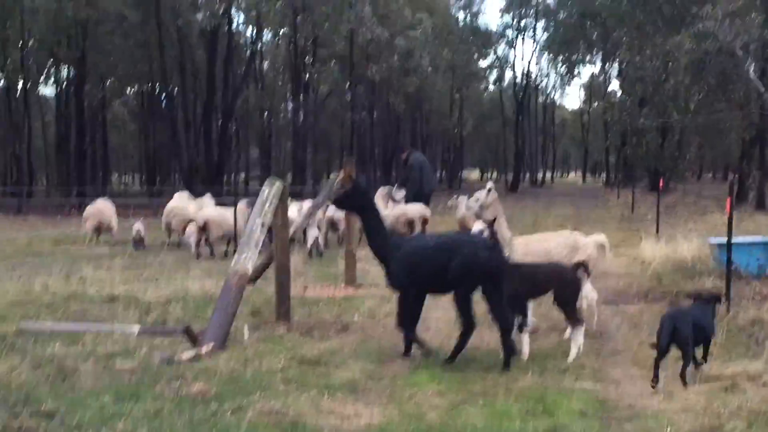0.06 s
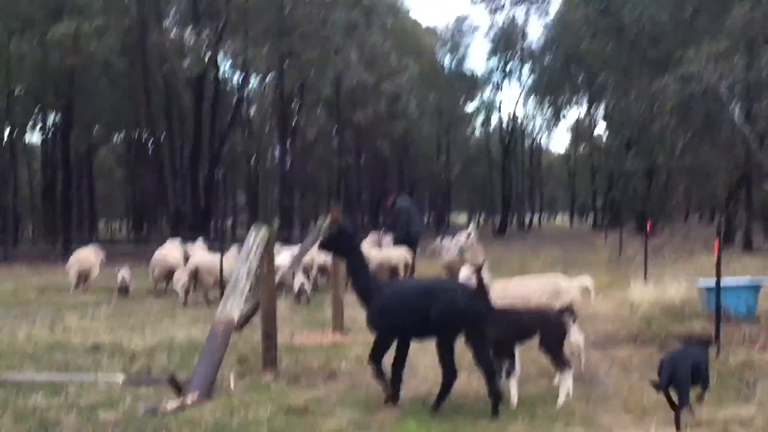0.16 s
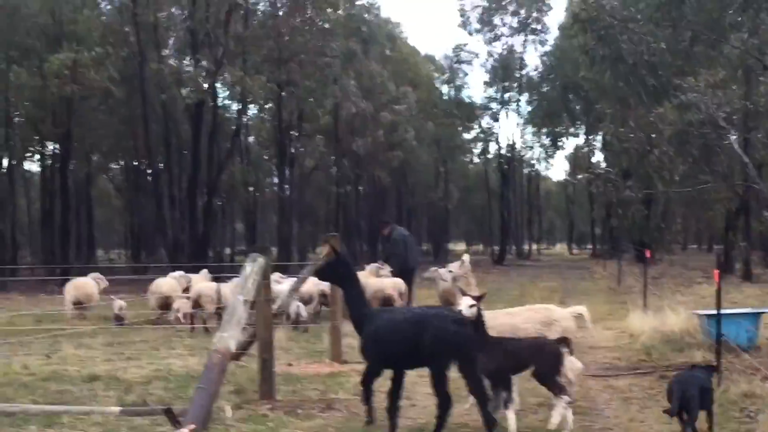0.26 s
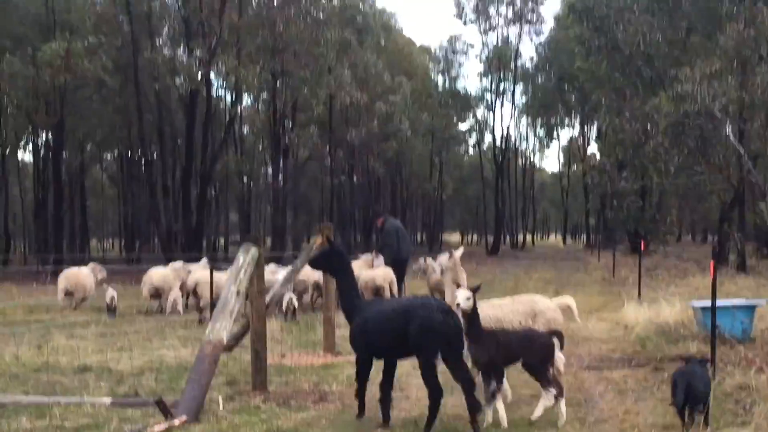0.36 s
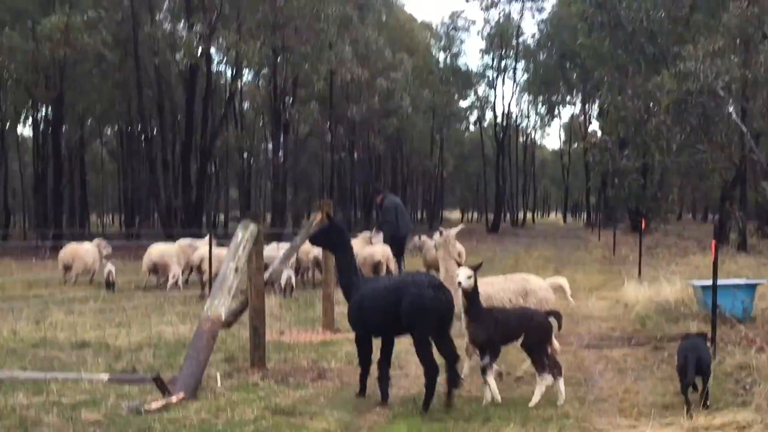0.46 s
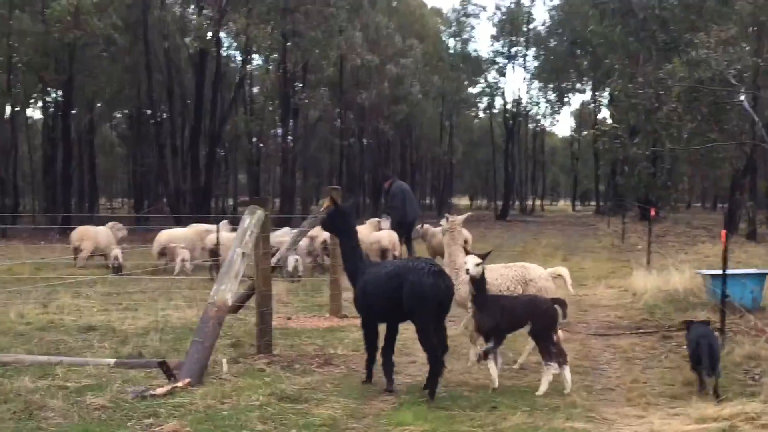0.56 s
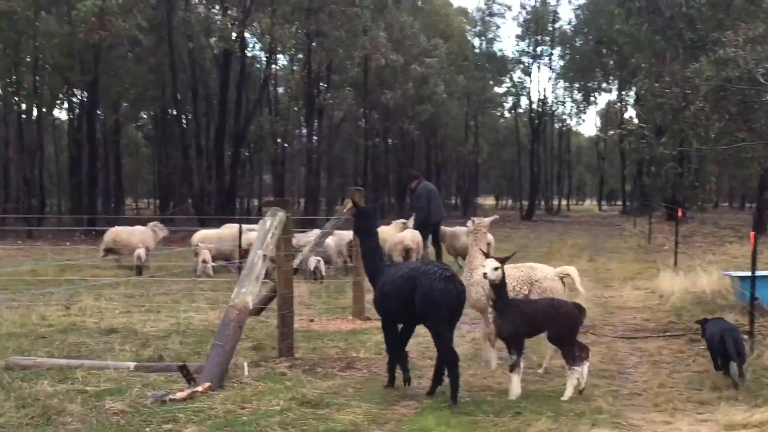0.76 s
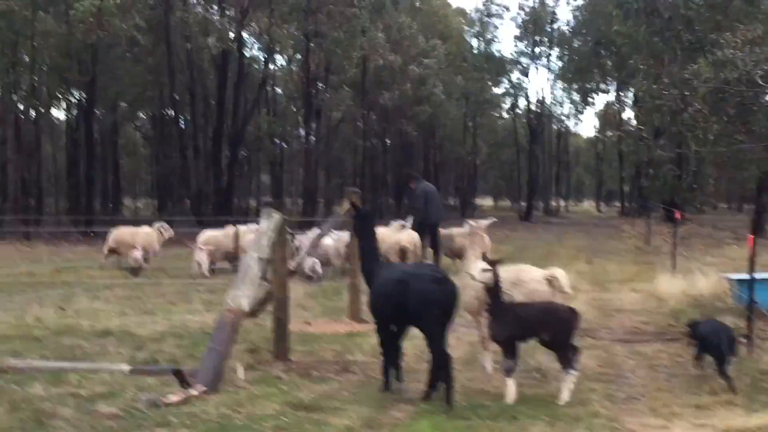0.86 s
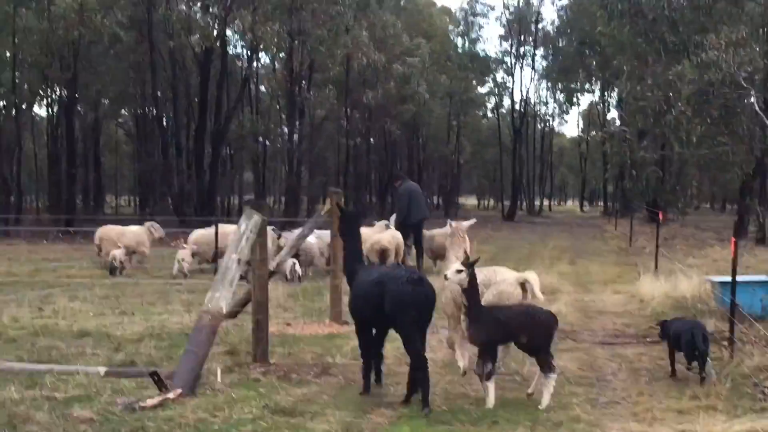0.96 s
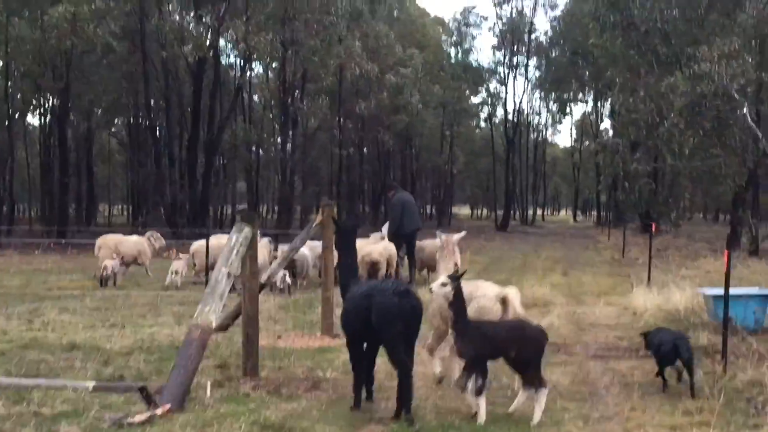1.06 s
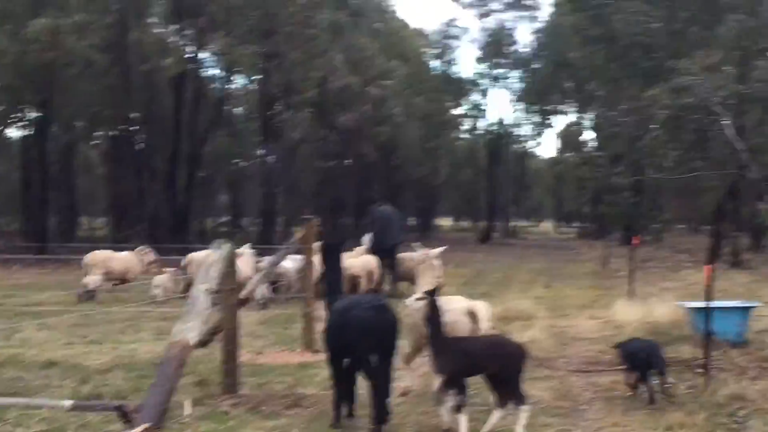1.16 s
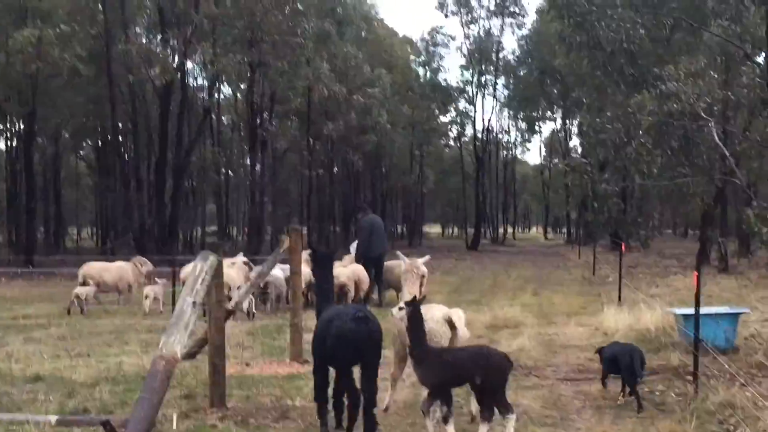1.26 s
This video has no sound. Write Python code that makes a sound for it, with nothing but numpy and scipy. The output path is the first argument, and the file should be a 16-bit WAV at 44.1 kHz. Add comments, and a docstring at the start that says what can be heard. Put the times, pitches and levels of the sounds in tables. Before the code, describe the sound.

A sheep gives one low, harsh bleat in a paddock, just after a faint grunt. It starts round, turns rasping and ends in a thin creak. Light wind and soft bumps touch the microphone throughout.

```python
"""First come light wind, a few soft bumps and a faint grunt; then a sheep in a paddock bleats once.
The bleat is low and harsh: sharp pulses from the throat make the resonances of the mouth ring.
It starts round, turns bright and rasping as the mouth opens, and ends in a thin creak.
Trees echo faintly, the grass rustles, and a faint wavering tone follows the bleat."""
import sys
import numpy as np
from scipy import signal
from scipy.fft import rfft, irfft, next_fast_len
from scipy.io import wavfile
from scipy.ndimage import uniform_filter1d, map_coordinates

SR = 44100
rng = np.random.default_rng(int(sys.argv[2]) if len(sys.argv) > 2 else 0)


def dump_mix(stems):
    """Bounce the given channels to the path in sys.argv[1] as a 16-bit WAV at rate SR."""
    frames = np.atleast_2d(stems).T  # one column per channel
    limited = np.clip(frames, -1, 1)  # hard clip at full scale
    pcm = np.round(limited * 32767).astype(np.int16)
    wavfile.write(sys.argv[1], SR, pcm)


N = 57330
TIME = np.arange(N) / SR


def amp(db):
    """Turn decibels into a number to multiply by."""
    return 10 ** (np.asarray(db) / 20)


def unit(x):
    """Scale a sound so that its average strength (rms) is 1."""
    return x / np.sqrt(np.mean(x ** 2) + 1e-20)


def along(points, hz):
    """Read between (f/Hz, value) points, spacing the frequencies by octaves."""
    freqs, values = np.transpose(points)
    return np.interp(np.log(hz + 1), np.log(freqs + 1), values)


def curve(rows):
    """Join (t/s, value) points with straight lines, one value per sample."""
    return np.interp(TIME, *np.transpose(rows))


def wobble(per_s):
    """A smooth curve through per_s random values each second."""
    return map_coordinates(rng.standard_normal(int(N * per_s / SR) + 4), [TIME * per_s])


def colour(x, points):
    """Filter a sound to a (f/Hz, level/dB) shape."""
    size = 2 * next_fast_len(N)
    cepstrum = irfft(np.log(amp(along(points, np.fft.rfftfreq(size, 1 / SR)))), size)
    # this fold makes the filter ring after each pulse, never before it
    cepstrum[1:size // 2] *= 2
    cepstrum[size // 2 + 1:] = 0
    return irfft(rfft(x, size) * np.exp(rfft(cepstrum)), size)[:N]


def noise(points):
    """Noise of strength 1 with a (f/Hz, level/dB) shape."""
    return unit(colour(rng.standard_normal(N), points))


# tone colour of the outdoor air and of the wind (f/Hz, relative level/dB)
AIR_SHAPE = [(20, -53.5), (45, -24), (80, 3), (160, -20), (250, -21), (400, -21), (550, -21.5),
             (1050, -17.5), (1700, -23), (2500, -25), (4000, -26.5), (6000, -30.5), (9000, -33),
             (10300, -36), (11500, -35.5), (17000, -37)]
WIND_SHAPE = [(20, -46), (40, -2.5), (70, -1.5), (110, -9), (200, -7), (330, -18), (700, -34), (2500, -81)]
# how the wind rises and falls (t/s, level change/dB)
WIND_SWELL = [(0, -9), (.13, 2), (.19, -11), (.26, 3), (.5, -0.5), (.9, 1.5), (1.1, -0.5), (1.3, -5)]
AIR_DB, WIND_DB, BUFFET_DB = -65, -65, 2.5


def breeze():
    """Steady outdoor air and a light flutter of wind on the microphone."""
    air = amp(AIR_DB) * noise(AIR_SHAPE)
    wind_db = WIND_DB + curve(WIND_SWELL) + BUFFET_DB * wobble(per_s=18)
    return air + amp(wind_db) * noise(WIND_SHAPE)


# short rustles in the grass (t/s, level/dB, width/s, centre f/Hz)
RUSTLES = [(.228, -62, 0.014, 2220), (0.278, -60, 0.014, 2400), (0.997, -62.5, 0.0052, 2450),
           (1.017, -66, 0.012, 2740), (1.109, -67, 0.016, 1744), (1.163, -76, 0.0017, 1303),
           (1.285, -60, 0.0021, 1520)]
# tone colour of dry grass (multiple of the centre frequency, relative level/dB)
GRASS_SHAPE = [(.15, -8.5), (.5, -11.5), (.75, -6.5), (1, -0.5), (1.2, -13), (2, -22.5), (3.7, -35),
               (6.5, -87)]


def rustles():
    """Dry grass makes brief, faint swells and ticks of noise."""
    out = np.zeros(N)
    for when, db, width, hz in RUSTLES:
        swell = np.exp(-.5 * ((TIME - when) / width) ** 2)
        out += amp(db) * swell * noise([(k * hz, level) for k, level in GRASS_SHAPE])
    return out


# soft thuds of steps and handling (t/s, level/dB, f/Hz, fade time/s)
BUMPS = [(.13, -50, 186, 0.0074), (0.228, -42, 125, 0.009), (0.339, -37, 190, 0.006),
         (.428, -46, 100, .008), (.49, -46, 100, .01), (.572, -51, 120, .025), (0.68, -46, 100, 0.018),
         (.814, -34, 110, 0.008), (0.851, -35, 120, 0.008), (.942, -40.5, 105, 0.009),
         (0.987, -48, 90, 0.01), (1.013, -41, 260, 0.007), (1.042, -48, 150, .007), (1.123, -51, 110, .007),
         (1.186, -56, 215, 0.014), (1.242, -41, 125, 0.009)]
BUMP_SAG, BUMP_SAG_S = .33, .014  # share of its pitch that a thud loses, and how fast
BUMP_ATTACK_S, BUMP_NOISE = .0037, .3


def bumps():
    """Each thud is a low, sinking tone plus dull noise, and dies away at once."""
    out = np.zeros(N)
    for start, db, hz, fade in BUMPS:
        age = np.maximum(TIME - start, 0)
        cycles = hz * ((1 - BUMP_SAG) * age + BUMP_SAG * BUMP_SAG_S * (1 - np.exp(-age / BUMP_SAG_S)))
        dull_noise = noise([(hz / 3, -25), (hz, 0), (2 * hz, -6), (8 * hz, -30), (40 * hz, -70)])
        body = np.sin(2 * np.pi * cycles) + BUMP_NOISE * dull_noise
        out += amp(db) * body * (1 - np.exp(-age / BUMP_ATTACK_S)) * np.exp(-age / fade)
    return out


# how long the trees echo (f/Hz, time to fade by 60 dB/s)
ECHO_TIMES = [(150, 0.65), (500, 0.5), (2300, 0.9), (8000, 0.55)]
ECHO_DB = -13.5


def tree_echo(sound):
    """Trees scatter a sound into a faint, blurred echo."""
    hz, t, spectrum = signal.stft(rng.standard_normal(SR), SR, nperseg=256)
    fade = amp(-60 * t / along(ECHO_TIMES, hz)[:, None])
    tail = signal.istft(spectrum * fade, SR, nperseg=256)[1]
    return amp(ECHO_DB) * signal.fftconvolve(sound, tail / np.linalg.norm(tail))[:N]


def soft_call(rows, overtones, waver):
    """A dull tone with weak overtones; waver sets how unsteady its pitch is."""
    times, hz, db = np.transpose(rows)
    pitch = np.interp(TIME, times, hz) * (1 + waver * wobble(per_s=120))
    phase = 2 * np.pi * np.cumsum(pitch) / SR
    tone = unit(sum(amp(level) * np.sin(round(k) * phase) for k, level in overtones))
    sounding = (TIME > times[0]) & (TIME < times[-1])
    return amp(np.interp(TIME, times, db)) * sounding * tone


# a faint tone after the bleat, and a brief note above it (t/s, f/Hz, level/dB)
FAR_TONE = [(.95, 445.4, -76), (1.016, 448.4, -67), (1.06, 403.7, -73.5), (1.104, 448.7, -67),
            (1.14, 392, -80), (1.19, 392.6, -65), (1.23, 380, -80)]
FAR_PIP = [(1.09, 647.4, -104), (1.112, 622, -61), (1.14, 599, -81)]
# tone colour of both (multiple of the pitch, relative level/dB)
FAR_OVERTONES = [(1, -5), (2, -13.5), (3, -37), (4, -42)]


def far_call():
    """Two faint wavering notes, perhaps from an animal far away."""
    tone = soft_call(FAR_TONE, FAR_OVERTONES, waver=.0355)
    return tone + soft_call(FAR_PIP, FAR_OVERTONES, waver=.0196)


# the path of each grunt, one list apiece (t/s, f/Hz, level/dB)
GRUNTS = [
    [(.176, 267.5, -73), (.187, 261, -56.5), (.205, 206.5, -52), (.216, 175.6, -47.5), (.224, 167, -68),
     (.234, 167, -48), (.246, 153, -67)],
    [(.28, 305, -63), (.3, 293, -54), (.338, 237, -52), (.358, 195, -54)],
]
# their tone colour (multiple of the pitch, relative level/dB)
GRUNT_OVERTONES = [(1, 4), (2, -16), (3, -15), (4, -16.5), (5, -32)]


def grunts():
    """Two low, falling grunts: one before the bleat, one under its start."""
    return sum(soft_call(grunt, GRUNT_OVERTONES, waver=.089) for grunt in GRUNTS)


# how fast the throat pulses, heard as pitch (t/s, f/Hz)
PITCH = [(0.28, 146.2), (0.302, 146.9), (0.32, 133.1), (0.346, 137.8), (0.372, 129.8), (0.39, 162.1),
         (0.405, 163.7), (0.44, 154.2), (0.475, 161.4), (0.515, 163.9), (0.56, 145.4), (0.594, 139.7),
         (0.628, 149.1), (0.668, 148.4), (0.705, 137.6), (0.738, 149.5), (0.772, 139.5), (0.82, 134.9),
         (0.852, 143.8), (0.885, 127.2), (0.95, 119.4)]
# how hoarse the throat is (t/s, amount from 0 to 1)
HOARSENESS = [(.3, 0.34), (.37, 0.67), (.41, 0.23), (.53, 0.43), (.58, 0.77), (.75, 0.76), (.9, 1)]
FLUTTER, JITTER_S, SHIMMER_DB = .0184, .0001, .83  # scatter of pitch, timing and size when fully hoarse
PUFF_FADE_S = .006


def throat():
    """Sharp pulses, each followed by a puff of air; hoarseness makes them uneven and breathy."""
    hoarse = np.clip(curve(HOARSENESS), 0, 1)
    cycles = np.cumsum(curve(PITCH) * (1 + FLUTTER * hoarse * wobble(per_s=90))) / SR
    times = np.interp(np.arange(1, int(cycles[-1])), cycles, TIME)
    scatter = rng.standard_normal((N, 2))[:len(times)] * np.interp(times, TIME, hoarse)[:, None]
    centres = (times + JITTER_S * scatter[:, 0]) * SR
    sizes = amp(SHIMMER_DB * scatter[:, 1:])
    # draw each pulse over 16 samples, so its centre can fall between two of them
    samples = centres.astype(int)[:, None] + np.arange(-7, 9)
    offset = samples - centres[:, None]
    shape = np.sinc(offset) * np.cos(np.pi * offset / 16) ** 2
    pulses = np.bincount(np.clip(samples, 0, N - 1).ravel(), (shape * sizes).ravel(), N)
    puffs = signal.lfilter([1], [1, -np.exp(-1 / (PUFF_FADE_S * SR))], pulses)
    return unit(pulses), hoarse * unit(puffs * rng.standard_normal(N))


def resonance(source, shapes, level, breath, blend=[(0, 0)], fade_s=.0029):
    """Pulses and breath ring a resonance; blend slides it from its first shape to its last."""
    pulses, air = source
    rings = [unit(colour(pulses + breath * air, shape)) for shape in shapes]
    ring = rings[0] + np.clip(curve(blend), 0, 1) * (rings[-1] - rings[0])
    # even out the loudness, then follow the level table and fade beyond its ends
    power = uniform_filter1d(uniform_filter1d(ring * ring, size=1000), size=1000)
    steady = ring / np.sqrt(np.abs(power) + 1e-12)
    outside_s = np.maximum(level[0][0] - TIME, 0) + np.maximum(TIME - level[-1][0], 0)
    return steady * amp(curve(level)) * np.exp(-outside_s / fade_s)


# tone colours of the nose's hum, the mouth's three resonances, the airy fizz on top
# and the closing creak (f/Hz, relative level/dB)
HUM_SHAPE = [(70, -70), (125, 3), (160, 1.5), (300, -4), (470, -14.5), (600, -47.5), (900, -84.5)]
LOW_NARROW = [(250, -28), (480, -14.5), (580, -7.5), (660, 11), (740, -7.5), (830, -9), (950, -22),
              (1200, -19), (2000, -80), (5000, -111)]
LOW_OPEN = [(250, -37), (440, -14.5), (570, -4.5), (670, 4.5), (740, -5.5), (830, -19.5), (900, -11),
            (1000, -16), (1100, -29), (2000, -47.5), (5000, -73)]
MID_SHAPE = [(800, -47), (1000, -15), (1120, -23), (1250, -23.5), (1350, -7.5), (1480, 0.5), (1610, -11),
             (1800, -1), (2400, -54.5), (5000, -80.5)]
HIGH_NARROW = [(1100, -66), (1600, -34), (1730, -0.5), (1900, -7.5), (2130, 0.5), (2300, 2.5), (2450, -40),
               (2700, -5.5), (2830, -17), (2950, -58), (3300, -20), (4200, -55), (8000, -78)]
HIGH_OPEN = [(1100, -81), (1700, 3.5), (2000, -1.5), (2250, 7.5), (2400, 5), (2580, 5.5), (2780, -10.5),
             (2900, -20), (3080, -11.5), (3400, -42), (4200, -55), (8000, -92.5)]
FIZZ_SHAPE = [(2500, -28.5), (3400, 1.5), (3800, -5), (4400, -1.5), (4700, -4), (5050, -18.5), (5700, -11),
              (7200, -13.5), (8200, -38), (11000, -28), (16000, -64)]
CREAK_START = [(1500, -42), (2300, -17.5), (2600, -8), (2850, 2), (3100, -27), (3800, -19), (6000, -34),
               (10000, -43)]
CREAK_END = [(1500, -35), (2400, 10.5), (2850, -6), (3100, 4), (3400, 6), (3700, -0.5), (4200, -16),
             (6000, -20), (10000, -55.5), (16000, -69)]
# how loud each part is (t/s, level/dB)
HUM_LEVEL = [(0.266, -71), (0.294, -45.5), (.335, -54.5), (.365, -50.5), (0.398, -47), (.54, -45.5),
             (0.571, -55), (0.746, -52.5), (.79, -60), (.865, -53), (0.91, -70)]
LOW_LEVEL = [(0.275, -73), (.301, -53.5), (0.31, -46), (0.342, -42), (0.384, -42), (0.401, -40.5),
             (0.508, -37.5), (0.542, -38), (0.568, -52.5), (0.605, -47.5), (0.834, -49), (0.911, -53),
             (0.949, -70)]
MID_LEVEL = [(0.29, -72.5), (0.348, -52.5), (0.482, -48.5), (0.524, -54), (0.546, -46), (0.582, -49),
             (0.636, -46), (0.862, -50.5), (0.95, -85)]
HIGH_LEVEL = [(0.295, -69), (0.31, -50), (0.328, -45), (0.391, -42.5), (0.406, -56.5), (0.436, -44.5),
              (0.475, -55), (0.53, -51), (0.554, -44.5), (0.685, -43), (0.855, -48), (0.953, -67.5),
              (0.965, -99)]
CREAK_LEVEL = [(.86, -69), (.895, -56.5), (0.936, -56), (0.96, -68)]
# the mouth opens, its low resonance widens, the creak brightens (t/s, amount from 0 to 1)
MOUTH_OPENING = [(.3, 0.37), (.39, 0.63), (.45, 0.42), (.51, 0.25), (.56, 0.96), (.88, 0.9)]
LOW_WIDENING = [(.525, 0.15), (.56, 0.85)]
CREAK_RISE = [(.895, 0.05), (.93, 0.67)]
FIZZ_DB = -25  # compared with the high resonance
SHAKE_DB = 1.8  # quick swings in the level of the low parts when fully hoarse


def bleat():
    """One throat drives every part of the sheep's voice; the low parts shake when it is hoarse."""
    def shake():
        return amp(SHAKE_DB * curve(HOARSENESS) * wobble(per_s=75))

    source = throat()
    hum = resonance(source, [HUM_SHAPE], HUM_LEVEL, breath=.6) * shake()
    low = resonance(source, [LOW_NARROW, LOW_OPEN], LOW_LEVEL, breath=.65, blend=LOW_WIDENING) * shake()
    mid = resonance(source, [MID_SHAPE], MID_LEVEL, breath=.86)
    high = resonance(source, [HIGH_NARROW, HIGH_OPEN], HIGH_LEVEL, breath=.42, blend=MOUTH_OPENING)
    fizz = amp(FIZZ_DB) * resonance(source, [FIZZ_SHAPE], HIGH_LEVEL, breath=1.7)
    creak = resonance(source, [CREAK_START, CREAK_END], CREAK_LEVEL, breath=1.0, blend=CREAK_RISE)
    return hum + low - mid + high + fizz + creak  # the minus turns the middle wave upside down


def scene():
    """The calls and their echo over the quiet paddock, in one channel."""
    calls = bleat() + grunts() + far_call()
    return (calls + tree_echo(calls) + bumps() + rustles() + breeze())[None]


def record(dry):
    """The microphone drops the deepest bass and the very highest treble."""
    low_cut_hz, top_hz = 34, 17100
    size = next_fast_len(N + SR // 2)
    trimmed = signal.sosfilt(signal.butter(4, low_cut_hz, "highpass", fs=SR, output="sos"), dry)
    in_range = np.fft.rfftfreq(size, 1 / SR) < top_hz
    return irfft(rfft(trimmed, size) * in_range, size)[..., :N]


dry = scene()
out = record(dry)
dump_mix(out)
```